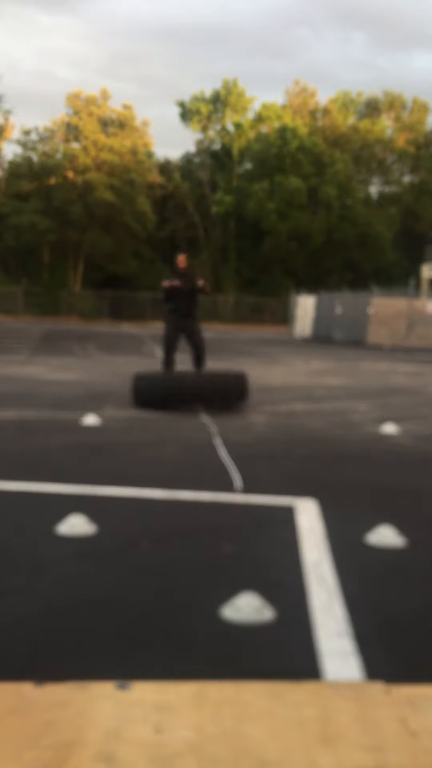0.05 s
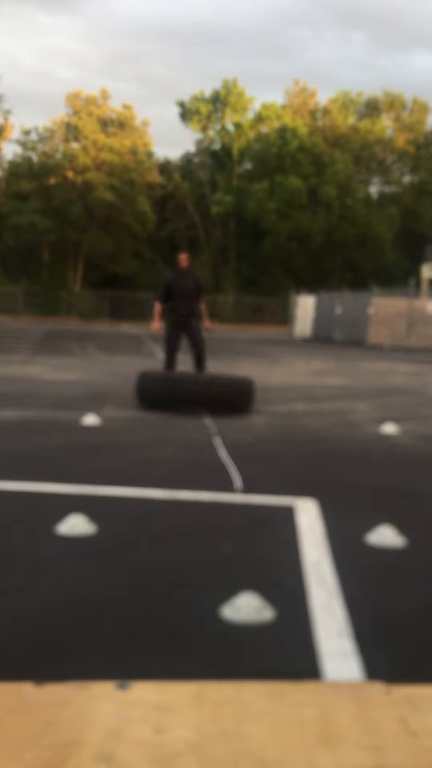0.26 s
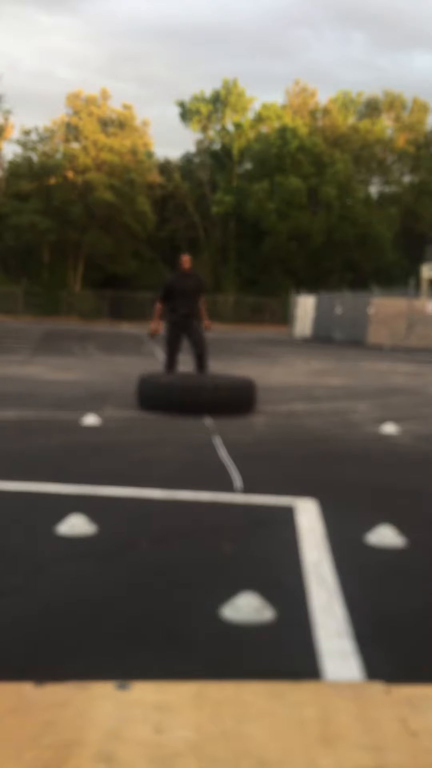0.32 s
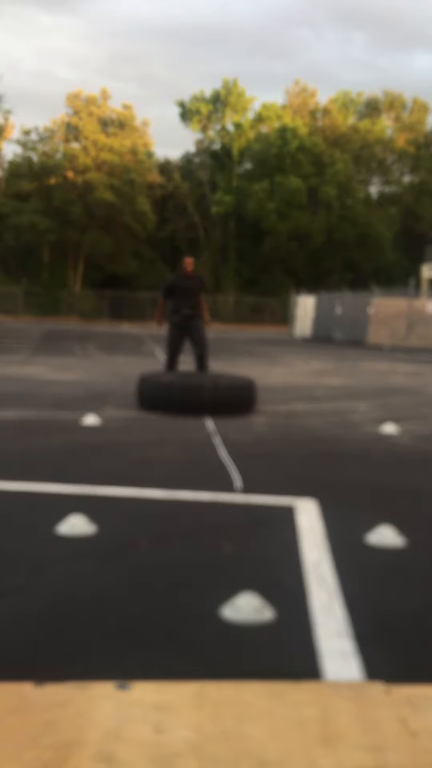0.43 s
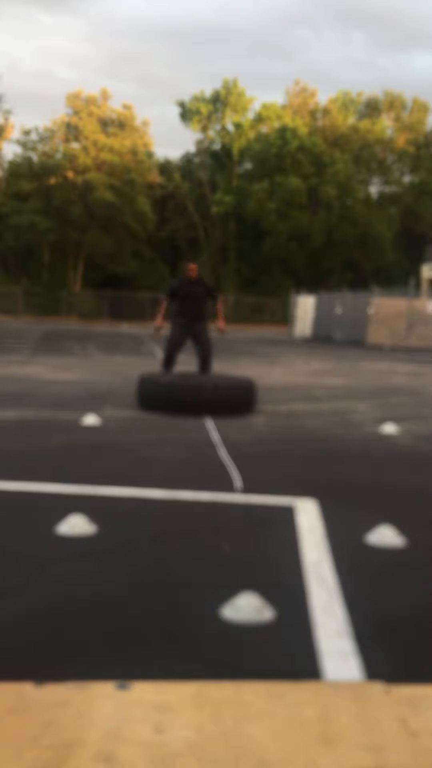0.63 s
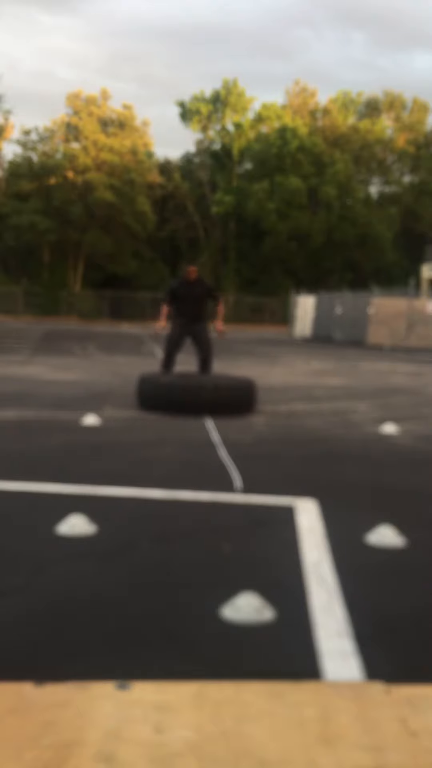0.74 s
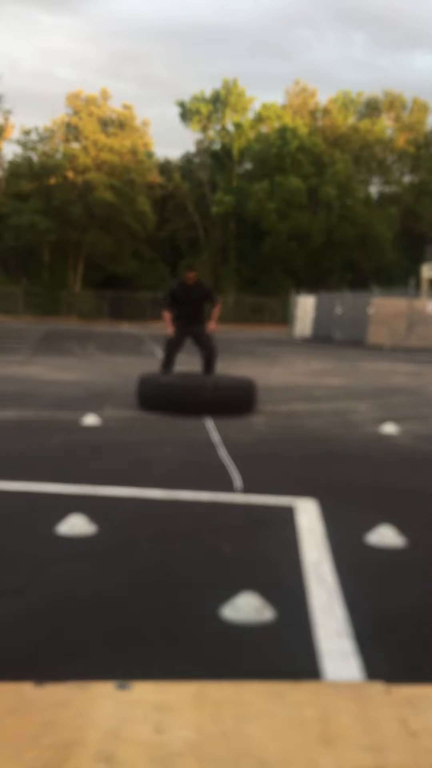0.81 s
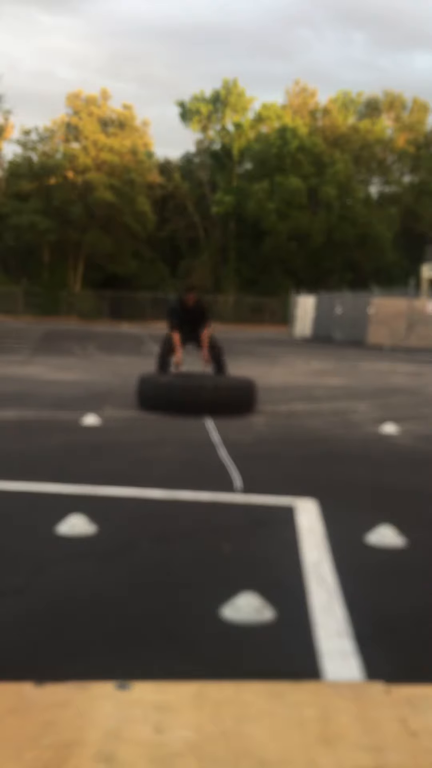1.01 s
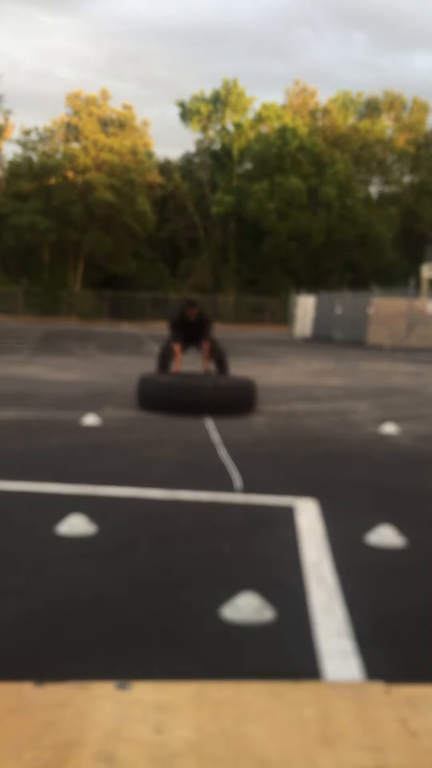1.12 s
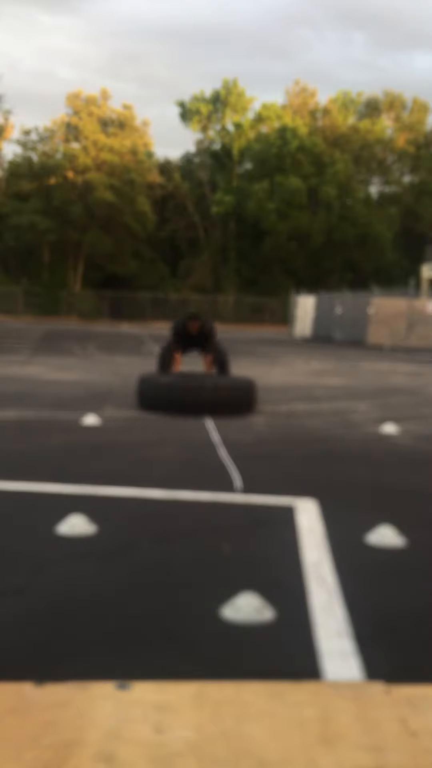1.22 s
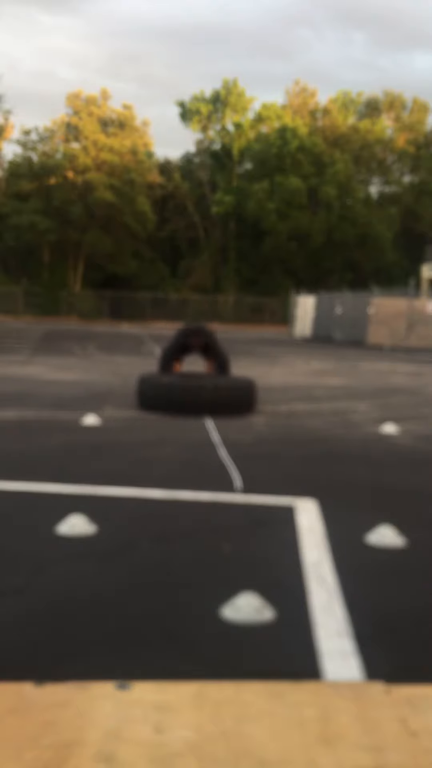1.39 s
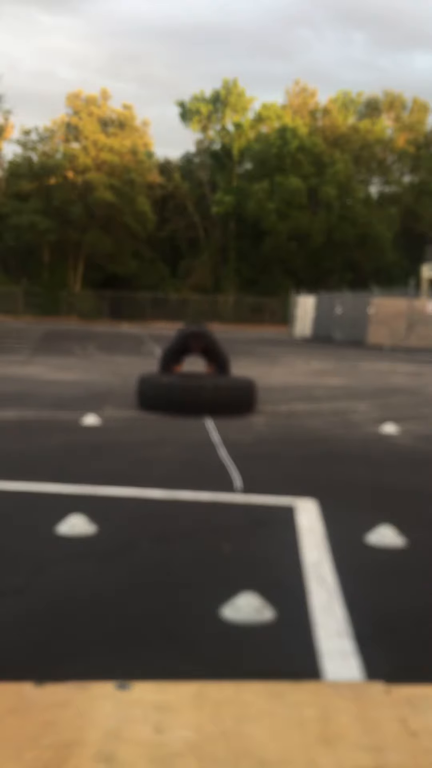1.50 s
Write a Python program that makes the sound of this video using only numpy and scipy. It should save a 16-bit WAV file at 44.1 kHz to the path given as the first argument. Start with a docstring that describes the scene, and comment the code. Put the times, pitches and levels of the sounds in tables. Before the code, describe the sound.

In an outdoor lot, a big tire slams onto the pavement with a cracking thud, hops once and rocks to rest. A low echo fades away, leaving faint gritty scuffs and a far traffic rumble.

```python
"""A heavy tire falls flat on asphalt: the tread slaps, trapped air cracks out and the carcass booms.
It hops, lands with a duller thud and rocks to rest in soft bass pulses while its air cavity hums.
Far walls throw the bass back and trees scatter the hard landings into a long tail.
Shoes scuff and squeak on grit; behind them traffic rumbles, an engine drones and insects buzz."""
import sys
import numpy as np
from scipy.fft import rfft, irfft, next_fast_len
from scipy.io import wavfile
from scipy.ndimage import map_coordinates

SR = 44100
rng = np.random.default_rng(int(sys.argv[2]) if len(sys.argv) > 2 else 0)


def generate_wav(sig):
    """Save sig (samples, or channels by samples) to the path in sys.argv[1] as 16-bit PCM at SR."""
    pcm = np.round(np.clip(np.atleast_2d(sig).T, -1, 1) * 32767).astype(np.int16)
    wavfile.write(sys.argv[1], SR, pcm)


N = 68355
T = np.arange(N) / SR
FFT_SIZE = next_fast_len(N + 8192)
HZ = np.fft.rfftfreq(FFT_SIZE, 1 / SR)


def amp(db):
    return 10 ** (np.asarray(db) / 20)


def unit(x):
    return x / np.sqrt(np.mean(x ** 2) + 1e-20)


def along(points, hz):
    """Read (Hz, value) points on a log frequency axis."""
    freqs, values = np.transpose(points)
    return np.interp(np.log(hz + 1), np.log(freqs + 1), values)


def eq(points):
    """Gain per frequency from (Hz, dB) points."""
    return amp(along(points, HZ))


def fader(points):
    """Gain per sample from (s, dB) points."""
    return amp(np.interp(T, *np.transpose(points)))


def wobble(rate):
    """A smooth random curve, rate knots a second."""
    return map_coordinates(rng.standard_normal(400), [T * rate], mode="wrap")


def filtered(x, gain):
    return irfft(rfft(x, FFT_SIZE) * gain, FFT_SIZE)[..., :N]


def noise(gain):
    """Coloured noise of rms 1."""
    return unit(filtered(rng.standard_normal(N), gain))


def lowpass(hz, corner_hz, order=2):
    return 1 / np.sqrt(1 + (hz / corner_hz) ** (2 * order))


def delay(seconds):
    """Frequency response of a delay."""
    return np.exp(-2j * np.pi * HZ * seconds)


def minimum_phase(gain):
    """The most front-loaded response with this gain per frequency."""
    cepstrum = irfft(np.log(np.maximum(gain, 1e-6)), FFT_SIZE)
    cepstrum[1:FFT_SIZE // 2] *= 2
    cepstrum[FFT_SIZE // 2 + 1:] = 0
    return np.exp(rfft(cepstrum))


def envelope(start, rise, hold, t60):
    """Linear attack, hold, exponential release; all in seconds."""
    age = T - start
    attack = np.clip(age / max(rise, 1e-5), 0, 1)
    return attack * np.exp(-np.log(1000) * np.maximum(age - rise - hold, 0) / t60)


def octave_decay(x, start, rise, t60s):
    """Each octave of x fades at its own speed."""
    centres = 62.5 * 2.0 ** np.arange(9)
    out = np.zeros(N)
    for hz, pick in zip(centres, np.eye(len(centres))):
        band = filtered(x, along(np.c_[centres, pick], HZ))
        out += band * envelope(start, rise, 0, along(t60s, hz))
    return out


def tire_boom():
    """Every landing pumps the air in the tire for a few cycles; the inflated shape rings on."""
    # Each row: start in seconds, level in dB, pitch in Hz, then rise, hold and t60 in seconds.
    landings = [(0.2092, -5, 98.8, 0.025, 0.025, .055), (0.4548, -11, 87.4, 0.0053, 0.014, 0.075),
                (0.61, -22.5, 76.6, 0.0098, 0.0198, 0.14), (0.763, -33, 77, 0.0124, 0.0098, 0.078),
                (.842, -27, 81.5, 0.009, .02, 0.038)]
    # The lingering hum. Each row: start in seconds, pitch in Hz, level in dB, t60 in seconds.
    rings = [(0.252, 88.64, -18.5, 0.53), (.456, 166, -31, 1.3)]
    sag_per_s = 3.9  # the pitch relaxes as the rubber spreads
    out = np.zeros(N)
    for start, db, hz, rise, hold, t60 in landings:
        age = np.maximum(T - start, 0)
        pitch = hz * np.exp(-sag_per_s * age) * (age > 0)
        phase = 2 * np.pi * np.cumsum(pitch) / SR
        out += amp(db) * envelope(start, rise, hold, t60) * np.sin(phase)
    for start, hz, db, t60 in rings:
        out += amp(db) * envelope(start, 0.03, 0, t60) * np.sin(2 * np.pi * hz * (T - start))
    return out


def tire_carcass():
    """Damped rubber modes, struck at the fall and at the bounce; a soft contact keeps the treble out."""
    # Each row: start in seconds, level in dB, low-pass corner in Hz, contact in seconds, an unused zero.
    blows = [(0.2063, -16.5, 4550, 0.00092, 0), (.454, -18, 602, 0.0081, 0)]
    # Each row: pitch in Hz, relative level in dB, t60 in seconds.
    modes = [(186, -2.5, 0.079), (296.6, -0.5, 0.066), (422, -1.5, 0.12), (530.5, 0, .11),
             (706.5, -14.5, 0.52), (766, -7, 0.17), (957, 0, .11), (1065, 1.5, .075), (1130, -11, 0.18),
             (1281, -1, 0.13), (1410, -17, 0.065), (1560, 2, 0.037), (1830, -5, 0.042), (2464, -3, 0.041),
             (2700, -2.5, 0.054), (2926, -13, 0.052), (3200, 5.5, 0.028), (3400, -6.5, 0.028),
             (3850, 1.5, 0.027), (4000, -14.5, 0.015)]
    build_cycles = 2  # low modes take longer to build up
    out = np.zeros(N)
    for start, db, corner_hz, contact, _ in blows:
        for hz, mode_db, t60 in modes:
            phase = 2 * np.pi * (hz * (T - start) + rng.random()) + 0.15 * wobble(120.3)
            gain = amp(db + mode_db - 3.5) * lowpass(hz, corner_hz, order=4)
            out += gain * envelope(start, build_cycles / hz, contact, t60) * np.sin(phase)
    return out


def tread_slap():
    """The tread touches, slaps down flat, and gives a dull smack after the hop."""
    # Each row: start in seconds, level in dB, rise in seconds, low-pass corner in Hz.
    slaps = [(0.191, -33.5, 0.0024, 1098), (0.1995, -22.5, .004, 1720), (0.2053, -13, 0.0015, 12000)]
    # Tone of the slaps and of the smack. Each row: frequency in Hz, gain in dB.
    slap_colour = [(40, -27.5), (200, 4), (600, -2.5), (1200, -1), (2000, -10.5), (3400, -8), (4600, -15.5),
                   (8500, -16), (15500, -21.5)]
    smack_colour = [(60, 2), (300, 8), (560, 6.5), (750, -4), (1050, -7), (1500, -8), (2200, -16),
                    (2900, -27.5), (6000, -34.5), (9500, -37.5), (15500, -43)]
    # Decay of the slaps. Each row: frequency in Hz, t60 in seconds.
    slap_t60s = [(150, 0.21), (1000, 0.13), (3500, 0.14), (12000, 0.049)]
    smack = envelope(start=0.4513, rise=0.0026, hold=0.0013, t60=0.046)
    out = amp(-16) * smack * noise(eq(smack_colour))
    for start, db, rise, corner_hz in slaps:
        rubber = noise(eq(slap_colour) * lowpass(HZ, corner_hz))
        out += amp(db) * octave_decay(rubber, start, rise, slap_t60s)
    return out


def air_cracks():
    """Trapped air escapes as the sidewall seals: a cluster of pressure spikes, each with a short hiss."""
    # Each row: start in seconds, level in dB.
    cracks = [(0.2062, 4), (.2086, 10), (0.2095, 5), (0.2098, -4)]
    # Tone of spike and hiss. Each row: frequency in Hz, gain in dB.
    colour = [(200, -10), (1000, -4.5), (1600, -0.5), (2050, -7), (2700, -0.5), (3300, 2), (3850, -2),
              (4500, -28.5), (5400, -2), (6700, -2), (7600, -6), (9400, -2), (10800, -17), (12900, -7.5),
              (15500, -23)]
    jitter_s, hiss_db = 0.00006, -18
    spike = minimum_phase(unit(eq(colour)))
    out = np.zeros(N)
    for start, db in cracks:
        snap = irfft(spike * delay(start + jitter_s * rng.standard_normal()), FFT_SIZE)[:N]
        hiss = amp(hiss_db) * noise(eq(colour)) * envelope(start, 0.0001, 0.00025, t60=0.0065)
        out += amp(db) * (snap + hiss)
    return out


def wall_echoes(tire):
    """Flat walls throw the tire's low end back."""
    # Each row: delay in seconds, level in dB.
    walls = [(.108, -20), (0.179, -22.5)]
    taps = sum(amp(db) * delay(seconds) for seconds, db in walls)
    return filtered(tire, lowpass(HZ, corner_hz=295) * taps)


def tree_tail():
    """Trees scatter each hard landing into a diffuse tail whose treble dies first."""
    # Each row: start in seconds, level in dB, low-pass corner in Hz.
    tails = [(.225, -32.5, 15000), (.465, -36, 610)]
    # Tone of the tail. Each row: frequency in Hz, gain in dB.
    colour = [(35, -20.5), (70, 7.5), (150, 5.5), (300, -1.5), (430, 1), (700, -1.5), (1100, -1.5),
              (2000, -3.5), (2800, -14), (4300, -14.5), (6500, -20), (9000, -23.5), (15000, -29.5)]
    # Its decay. Each row: frequency in Hz, t60 in seconds.
    t60s = [(80, 1.6), (200, 1.87), (500, 1.5), (1000, 1.24), (3000, 0.91), (10000, 0.27)]
    out = np.zeros(N)
    for start, db, corner_hz in tails:
        wash = noise(eq(colour) * lowpass(HZ, corner_hz))
        out += amp(db) * octave_decay(wash, start, 0.0084, t60s)
    return out


def echoes_and_scrape():
    """Two blurred echoes of the slam, then a short dull scrape; each is a burst of noise."""
    # Each row: start in seconds, level in dB, rise and t60 in seconds, low-pass corner in Hz.
    bursts = [(0.277, -30.5, .004, 0.09, 1800), (0.334, -32.5, 0.021, 0.66, 2600),
              (.377, -26.5, 0.0054, 0.034, 800)]
    # Tone of the bursts. Each row: frequency in Hz, gain in dB.
    colour = [(50, -8.5), (140, 7.5), (300, -2), (450, -4.5), (700, 3.5), (1200, -6.5), (2000, -6.5),
              (3000, -13.5), (8000, -12), (15000, -29)]
    return sum(amp(db) * envelope(start, rise, 0, t60) * noise(eq(colour) * lowpass(HZ, corner_hz))
               for start, db, rise, t60, corner_hz in bursts)


def grit():
    """Small stones tick and scrape under rubber and shoes."""
    # Single ticks. Each row: start in seconds, relative level in dB.
    stones = [(0.112, -40), (0.3066, -46), (0.368, -26.5), (0.4503, -42), (0.4574, -31), (0.5491, -37.5),
              (0.8739, -40), (0.9, -36.5), (0.9682, -46.5), (0.9784, -41.5), (1.206, -41), (1.26, -37.5),
              (1.2715, -46)]
    # Swell of the scuffing. Each row: time in seconds, level in dB.
    scuff_levels = [(0, -55.5), (.07, -84), (.15, -54), (.42, -57.5), (.47, -51.5), (.53, -53.5),
                    (.58, -56), (.63, -69.5), (.8, -63), (.9, -63), (1.02, -62.5), (1.14, -69),
                    (1.26, -53.5), (1.35, -56.5), (1.55, -55.5)]
    # Tone of the ticks and of the scuffing. Each row: frequency in Hz, gain in dB.
    tick_colour = [(300, -8), (1500, 8), (3000, 0.5), (5000, -3), (9000, -16), (15500, -45)]
    scuff_colour = [(500, -48), (2000, -2.5), (3300, 4), (4400, -7), (8800, -10), (11000, -14.5),
                    (15500, -14)]
    ticks = sum(amp(db - 8) * envelope(start, 0.0018, 0.001, t60=0.031) for start, db in stones)
    grain = unit(amp(2.3 * np.clip(wobble(300), -2, 2)))
    return ticks * noise(eq(tick_colour)) + fader(scuff_levels) * grain * noise(eq(scuff_colour))


def shoe_squeaks():
    """Rubber soles squeak briefly on the asphalt, each a narrow peak of noise."""
    # Each row: start in seconds, level in dB, pitch in Hz.
    squeaks = [(.968, -49.5, 2680), (1.204, -48.5, 2750), (1.258, -48, 5270), (1.27, -45, 3100),
               (1.37, -50, 2490), (1.416, -51, 3250)]
    width = 0.074  # share of the pitch
    out = np.zeros(N)
    for start, db, hz in squeaks:
        resonance = 1 / (1 + ((HZ / hz - 1) / width) ** 2)
        out += amp(db) * envelope(start, 0.002, 0.0033, t60=0.019) * noise(resonance)
    return out


def engine():
    """A distant engine drones on three wavering partials."""
    # Swell of the drone. Each row: time in seconds, level in dB.
    levels = [(0, -44), (.6, -34.5), (.8, -43.5), (1.05, -42), (1.13, -34), (1.55, -39)]
    # Each row: ratio to the drone's pitch, relative level in dB.
    partials = [(1, 2.5), (2, -16), (3.94, -23.5)]
    pitch_hz = 92.65 * (1 + 0.0087 * wobble(8.05))
    phase = 2 * np.pi * np.cumsum(pitch_hz) / SR
    drone = sum(amp(db + 1.9 * wobble(11.83)) * np.sin(ratio * phase) for ratio, db in partials)
    return fader(levels) * drone * np.sqrt(2)


def insects():
    """Insects buzz in a high, narrow, drifting band."""
    # Swell of the buzz. Each row: time in seconds, level in dB.
    levels = [(0, -58.5), (.1, -64.5), (.3, -64), (.55, -65), (.64, -61), (.78, -69), (.88, -58),
              (.95, -56.5), (1.07, -65), (1.3, -60.5), (1.5, -59.5)]
    # Centre of the band. Each row: time in seconds, pitch in Hz.
    pitches = [(0.0, 6490), (0.258, 6710), (0.478, 6450), (0.56, 6750), (0.768, 6410), (0.824, 6680),
               (1.07, 6480), (1.148, 6740), (1.308, 6470), (1.55, 6680)]
    width_hz, drift_hz = 190, 60.2
    pitch_hz = np.interp(T, *np.transpose(pitches)) + drift_hz * wobble(15)
    carrier = np.sin(2 * np.pi * np.cumsum(pitch_hz) / SR)
    flutter = noise(np.exp(-0.5 * (HZ / width_hz) ** 2))
    return fader(levels) * unit(carrier * flutter)


def traffic():
    """Far traffic lays a low, gently wavering bed under the lot."""
    # Tone of the rumble. Each row: frequency in Hz, gain in dB.
    colour = [(20, -35), (35, -22.5), (60, 3), (110, 1.5), (180, -4), (280, -8), (420, -18.5), (600, -25),
              (1100, -19), (1800, -23), (3000, -34.5), (5000, -45), (9000, -56.5), (15500, -71)]
    return amp(-39 + 0.86 * wobble(5.58)) * noise(eq(colour))


def scene():
    """The tire in its open lot, in mono."""
    tire = tire_boom() + tire_carcass() + tread_slap() + air_cracks()
    aftermath = wall_echoes(tire) + tree_tail() + echoes_and_scrape()
    return (tire + aftermath + grit() + shoe_squeaks() + engine() + insects() + traffic())[None]


def record(dry):
    """The microphone drops the deepest bass, rounds off the highest peaks and cuts the very top."""
    low_cut_hz, ceiling, top_hz = 33, 0.95, 15750
    thinned = filtered(dry, np.sqrt(1 - lowpass(HZ, low_cut_hz, order=3) ** 2))
    rounded = thinned / (1 + np.abs(thinned / ceiling) ** 6) ** (1 / 6)
    return filtered(rounded, lowpass(HZ, top_hz, order=80))


dry = scene()
out = record(dry)
generate_wav(out)
```